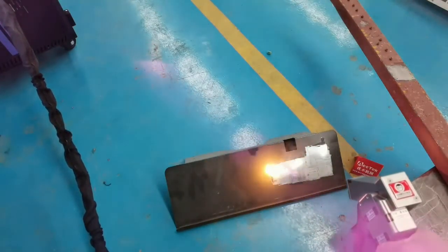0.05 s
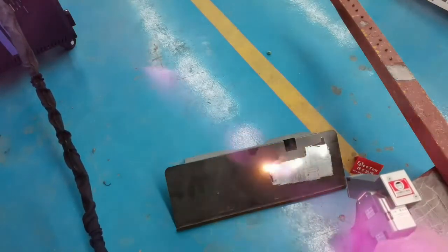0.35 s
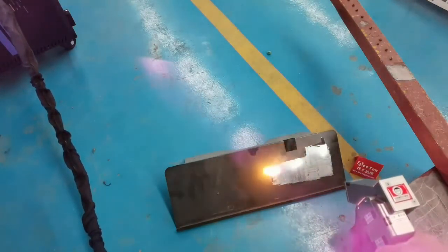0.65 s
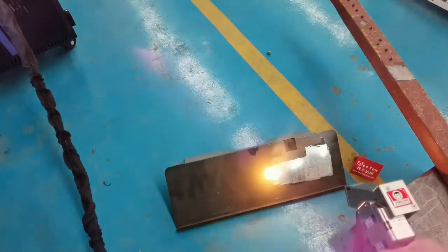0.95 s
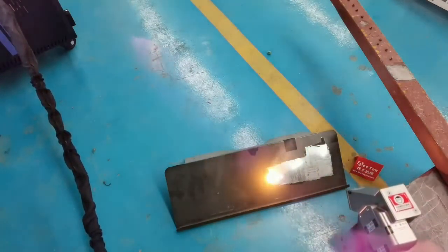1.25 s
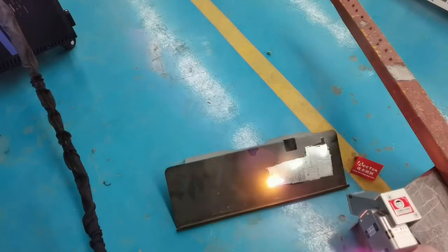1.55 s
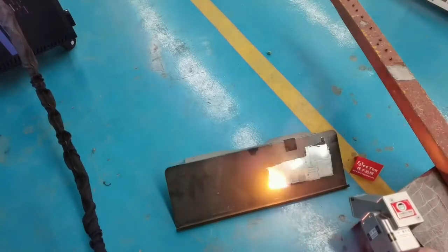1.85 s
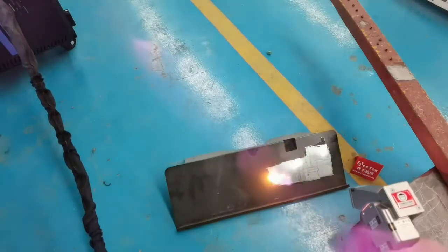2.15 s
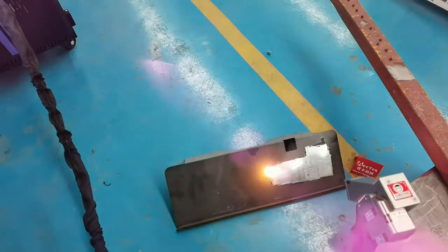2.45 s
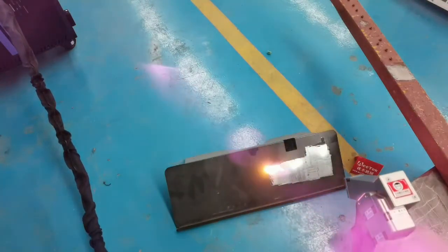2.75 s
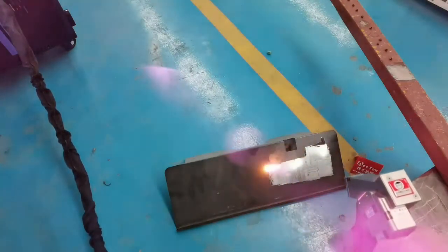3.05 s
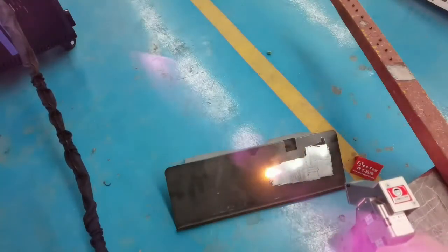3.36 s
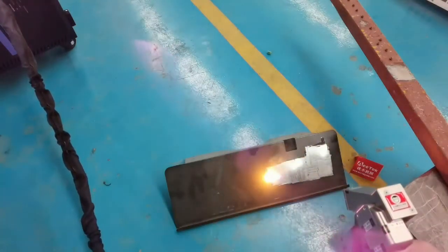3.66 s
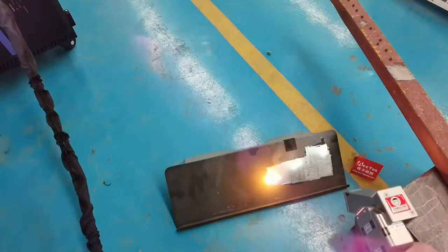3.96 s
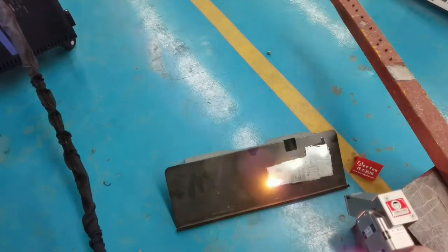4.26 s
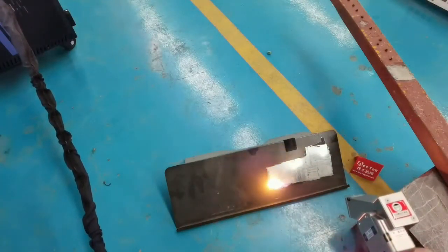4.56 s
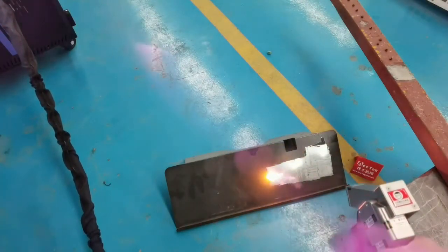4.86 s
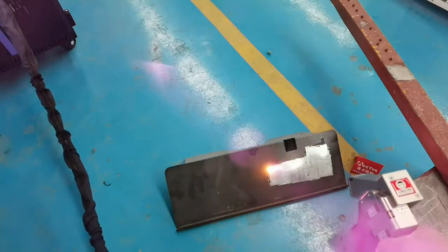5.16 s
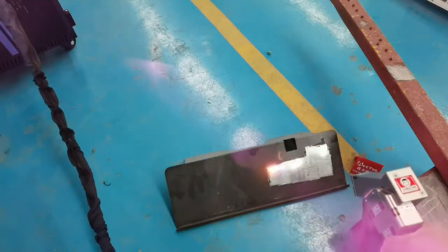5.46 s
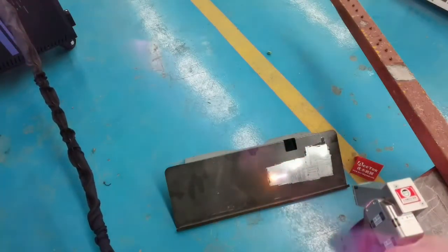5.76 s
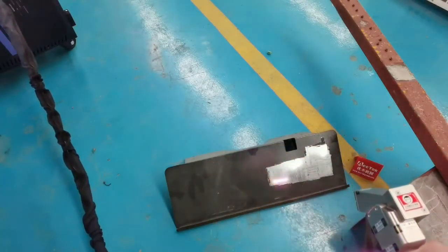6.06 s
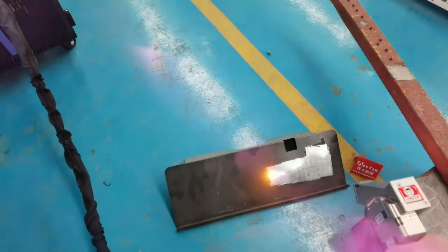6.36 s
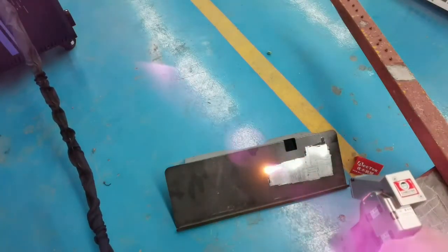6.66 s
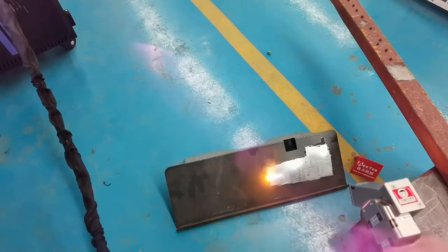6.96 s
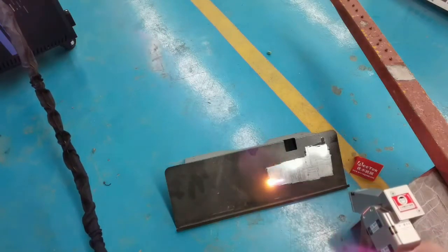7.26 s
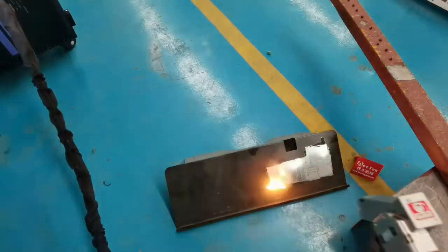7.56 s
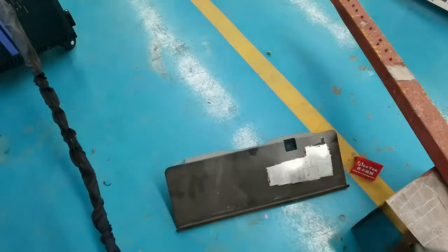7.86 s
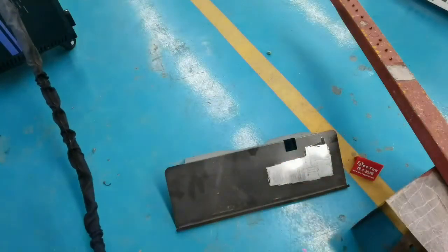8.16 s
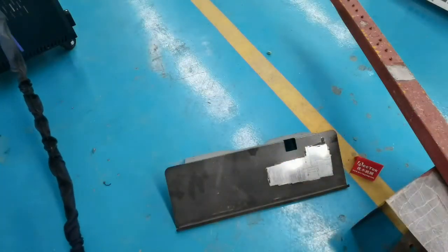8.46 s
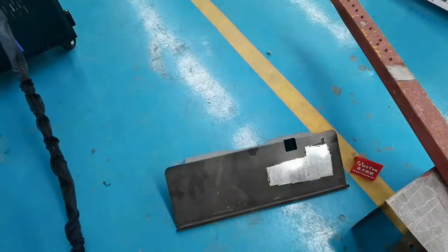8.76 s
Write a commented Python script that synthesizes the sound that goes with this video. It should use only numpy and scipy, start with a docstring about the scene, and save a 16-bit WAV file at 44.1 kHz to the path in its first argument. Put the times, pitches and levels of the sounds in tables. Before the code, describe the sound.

A hand-held laser cleaner burns coating off a steel panel close by, with a harsh, steady-pitched buzz full of snaps, sizzle and low flutter. Compressed air hisses and whistles a little farther off at the start. Past the middle the buzz thins to a fizz and the air whistles again. The buzz returns, flares and stops abruptly, leaving a fading whisper of air and the faint hum of a hard-walled workshop.

```python
"""A snapping, sizzling buzz comes first: a hand-held laser cleaner burns the coating off a steel panel.
Its beam crosses the panel about 300 times a second; each sweep puffs, snaps and sizzles, and the vapour
burns with a low flutter. Cleaned steel gives a thin fizz, and at 7.5 s the laser is switched off.
Compressed air whistles and hisses in two bouts, sets cavities ringing and trails away in a whisper.
Fans and transformers hum throughout in the hard-walled workshop, with three brief, dull rumbles."""
import sys
import numpy as np
from scipy import signal
from scipy.fft import rfft, irfft, next_fast_len
from scipy.io import wavfile
from scipy.ndimage import uniform_filter1d, map_coordinates

SR = 44100
rng = np.random.default_rng(int(sys.argv[2]) if len(sys.argv) > 2 else 0)


def output_pcm(signal):
    """Save a mono or channel-first signal as 16-bit PCM at the path in sys.argv[1].

    Samples are clipped to [-1, 1] before scaling.
    """
    pcm = np.clip(np.atleast_2d(signal).T, -1, 1) * 32767
    wavfile.write(sys.argv[1], SR, np.round(pcm).astype(np.int16))


N = 397782
TIME = np.arange(N) / SR

# mains hum: (frequency [Hz], level [dB])
MAINS_HUM = [(99.7, -60.5), (199.4, -56.5), (398.8, -78)]
# dull rumbles: (start [s], stop [s], level [dB])
RUMBLES = [(0, 0.254, -40.5), (8.37, 8.39, -49), (8.98, 9.02, -42.5)]
# reverberation of the room: (frequency [Hz], time to fall 60 dB [s])
REVERB_TIMES = [(200, 0.2), (2000, 0.38), (6000, 0.67), (14000, 0.052)]
# return of the beam's sound from the walls: (frequency [Hz], gain [dB])
WALL_RETURN = [(300, -27), (1200, -13), (3000, -12), (8000, -15)]
# left-right likeness of near and far sources: (frequency [Hz], correlation [-1 to 1])
NEAR_COHERENCE = [(300, 0.98), (600, 0.66), (1200, 0.026), (2500, 0.4), (5000, -0.25), (8000, -0.29),
                  (13000, 0.16)]
FAR_COHERENCE = [(100, 0.96), (300, 0.85), (800, 0.0013), (2000, 0.033), (5000, -0.098), (12000, -0.1)]
# spectra of the background and the air: (frequency [Hz], relative level [dB])
FAN_SPECTRUM = [(15, -40), (28, -29), (55, -3), (100, -5.5), (135, -13.5), (170, -12.5), (205, -8.5),
                (290, -21.5), (420, -22.5), (520, -15.5), (1000, -23), (2000, -22.5), (3900, -32),
                (6000, -25), (9000, -23.5), (10700, -27.5), (11600, -44), (15000, -48)]
RUMBLE_SPECTRUM = [(20, -20), (50, -8), (100, -1), (200, -7), (320, -23), (1000, -60)]
HISS_SPECTRUM = [(300, -57), (1100, -25), (1700, -11), (3000, -6), (3900, -9), (4600, 0.5), (5300, -4),
                 (6300, -1), (7800, 2.5), (9200, -16.5), (10200, -6.5), (11500, -61), (16000, -53)]
WHISPER_SPECTRUM = [(5000, -13), (7600, -13), (8600, 5), (9000, -5), (9500, 2.5), (10400, -9),
                    (11300, -33), (15000, -60)]
DUCT_DRIVE = [(2500, -18), (4500, 10), (8500, 0), (11000, -20)]
CAVITY_DRIVE = [(500, -15), (1600, 9), (2700, -6.5), (4500, -19)]
HOLLOW_TONE_DRIVE = [(1000, -25), (2200, -3), (2800, -11), (4500, -23)]
# resonances in the hiss and of blown cavities: (frequency [Hz], bandwidth [Hz], relative gain [dB])
DUCT_MODES = [(4650, 23, 6), (5250, 46, 9), (5880, 49, 8), (6120, 34, -14), (6430, 24, -34),
              (7200, 44, -13), (7500, 98, -7), (7920, 24, 4), (8040, 44, -6)]
CAVITY_MODES = [(2033, 11.6, 0), (2227, 48, -9.5), (2415, 25, 8.5)]
# blasts of compressed air: (start [s], stop [s], relative hiss level [dB], relative ring level [dB])
AIR_BLASTS = [(0.13, 0.856, -19, -32), (1.136, 1.217, -20, -35), (5.907, 6.409, -19, -28),
              (6.617, 6.696, -24.5, -30.5), (8.028, 8.225, -56, -54)]
# hollow tones as the air rushes in or slackens: (start [s], stop [s], frequency [Hz], level [dB])
CAVITY_TONES = [(0.85, 0.935, 2616, -24), (1.2, 1.3, 2600, -37), (5.912, 5.96, 2280, -32.5),
                (6.35, 6.42, 2035, -30), (7.678, 7.78, 2020, -47), (8.0, 8.2, 2580, -54)]
# nozzle tones: (start [s], stop [s], first pitch [Hz], target pitch [Hz], time constant of the climb [s],
# level [dB], fade [dB/s])
NOZZLE_TONES = [(.155, .23, 4890, 5340, .36, -21, 130), (.28, .8, 5060, 5340, .32, -20, 110),
                (.87, .89, 4912, 4912, .3, -24, 110), (1.18, 1.21, 4912, 4912, .3, -30, 90),
                (5.862, 5.872, 4710, 4800, .1, -20, 450), (5.91, 5.925, 4760, 4850, .1, -23, 300),
                (6.015, 6.14, 4900, 5060, .34, -15.3, 180), (6.18, 6.27, 4970, 5020, .08, -18, 60)]
# spectra of the beam's sounds: (frequency [Hz], relative level [dB])
FIZZ_SPECTRUM = [(4000, -34), (8500, 6), (10300, 9), (11800, -3), (15500, -1)]
FLAME_SPECTRUM = [(25, -42), (70, -22), (130, -7.5), (200, 1.5), (330, 3.5), (400, -11), (470, 1),
                  (640, -1), (1000, -9), (1800, -4), (3000, -21), (6000, -38)]
FLARE_SPECTRUM = [(80, -13), (250, 4), (1000, -7.5), (3200, 4.5), (7000, 3), (15000, -7)]
BOIL_SPECTRUM = [(1500, -10), (2300, -12), (3900, -14), (4700, -4), (5400, 5), (6400, 5), (7200, -2),
                 (8300, 7), (9300, -5.5), (10200, -7.5), (11500, -14.5), (16000, -67)]
SPATTER_SPECTRUM = [(300, -40), (600, -21), (1000, -19), (1450, 0), (1900, 5), (3300, 5.5), (4200, 3.5),
                    (8000, 7), (11500, -2), (14000, -7.5), (16000, -9.5)]
SNAP_SPECTRUM = [(400, -18), (600, -20.5), (900, 0.5), (1200, 2.5), (1500, -6), (1800, -2.5), (2400, -16.5),
                 (4000, -56.5)]
EDGE_SPECTRUM = [(1000, -59), (1500, -8.5), (1800, -4.5), (2100, -6), (2400, -8.5), (2700, -32),
                 (3300, -29), (5000, -45.5)]
SWIRL_SPECTRUM = [(300, -33), (700, 4.5), (1300, -24), (2200, 8.5), (4000, -30)]
# leftward lean of the buzz: (frequency [Hz], left gain and right loss [dB])
BUZZ_LEAN = [(300, 0), (700, .9), (1200, 1.8), (2200, 0)]
# spells with the beam on coating: (start [s], stop [s])
ON_COATING = [(0, 1.817), (2.0, 2.93), (3.14, 5.2), (6.6, 6.9), (7.03, 7.11), (7.2, 7.49)]
# relative levels of the plume: (time [s], puff [dB], edge of the snap [dB], flame [dB])
PLUME_LEVELS = [(0, -19, -26, -33.5), (.22, -24, -26, -30.5), (.35, -36.5, -35.5, -37),
                (.86, -38.5, -31, -35), (1.03, -31, -43, -37), (1.31, -28.5, -33.5, -34),
                (1.68, -34.5, -46, -36.5), (2.02, -25.5, -33.5, -42.5), (2.26, -27.5, -28.5, -40.5),
                (2.42, -28, -26.5, -40), (2.85, -33.5, -30.5, -54), (3.19, -28.5, -24, -48.5),
                (3.39, -25.5, -32, -38.5), (4.0, -31.5, -43.5, -35), (4.46, -30.5, -48, -40),
                (4.62, -25, -39.5, -40.5), (4.85, -41, -33, -47.5), (5.03, -66, -39.5, -75),
                (5.3, -66, -44, -60), (5.58, -39, -40, -49), (5.95, -38, -35, -43), (6.2, -44, -34, -67),
                (6.6, -35, -28, -45), (6.83, -30, -30, -41.5), (7.08, -34, -32, -57), (7.25, -32, -47, -49),
                (7.4, -43, -38, -43.5)]
# thick spots of coating spit, in relative levels: (time [s], puff [dB], snap [dB], flame [dB])
THICK_SPOTS = [(.19, -31, -28, -34), (1.66, -51, -37, -49), (2.27, -32, -40, -51), (2.69, -36, -40, -54),
               (2.84, -31, -50, -33), (2.91, -39, -64, -41), (3.46, -35, -45, -44), (4.37, -38, -42, -36),
               (4.55, -45, -37, -44), (4.63, -35, -40.5, -40), (4.825, -29, -39, -51),
               (4.91, -33, -43, -60), (5.215, -34.5, -49, -48), (7.05, -42, -45, -44),
               (7.225, -32, -42, -47), (7.305, -32, -44, -54)]
# flare-ups of the plume: (time [s], level [dB], time to fall 60 dB [s])
FLARE_UPS = [(5.202, -25, 0.095), (7.367, -24, 0.19), (7.415, -33, .12)]
# relative levels of the boiling coating: (time [s], boil [dB], fine spatter [dB])
SIZZLE_LEVELS = [(0, -27, -39.5), (1.14, -31, -41), (1.3, -38, -42), (1.8, -41, -40.5), (2.1, -30.5, -42.5),
                 (2.42, -37.5, -48.5), (2.68, -30.5, -43.5), (3.8, -31.5, -40.5), (4.35, -37, -40.5),
                 (4.9, -29.5, -41.5), (5.21, -30, -45.5), (5.3, -36.5, -47.5), (5.7, -34, -45.5),
                 (6.0, -33.5, -40), (6.6, -28, -38), (7.37, -34.5, -42), (7.5, -47.5, -48)]

SWEEP_HZ, TOP_HZ = 299.1, 15750
LASER_OFF_S, SHUTOFF_S = 7.535, .035


def amp(db):
    """Amplitude ratio: tenfold for every 20 dB."""
    return 10 ** (np.asarray(db) / 20)


def unit(x):
    """Normalisation to rms 1."""
    return x / np.sqrt(np.mean(x ** 2) + 1e-20)


def along(points, hz):
    """Interpolation of (frequency, value) points on a logarithmic frequency axis."""
    knots, values = np.transpose(points)
    return np.interp(np.log(hz + 1), np.log(knots + 1), values)


def curves(rows):
    """Linear interpolation in time: one curve for each column after the first."""
    times, *columns = np.transpose(rows)
    return [np.interp(TIME, times, column) for column in columns]


def held(start, stop, rise, fade):
    """Exponential growth and decay, in dB: 0 from start to stop, slopes in dB/s before and after."""
    return -rise * np.maximum(start - TIME, 0) - fade * np.maximum(TIME - stop, 0)


def settling(start, seconds):
    """Relaxation: 1 until start, then dying away with this time constant."""
    return np.exp(-np.maximum(TIME - start, 0) / seconds)


def noise():
    """White noise in two uncorrelated channels."""
    return rng.standard_normal((2, N))


def wobble(rate):
    """Random modulation: a smooth curve with rate knots a second."""
    knots = rng.standard_normal(int(N * rate / SR) + 4)
    return map_coordinates(knots, [np.arange(N) * rate / SR], mode="nearest")


def filtered(x, response):
    """Linear filtering: the spectrum of x times a complex frequency response."""
    size = next_fast_len(N + SR // 2)
    return irfft(rfft(x, size) * response(np.fft.rfftfreq(size, 1 / SR)), size)[..., :N]


def modes(table, hz):
    """Modal superposition: the complex response of damped resonances, alternating in sign."""
    return sum((-1) ** k * amp(db) * 1j * hz * width / (centre ** 2 - hz ** 2 + 1j * hz * width)
               for k, (centre, width, db) in enumerate(table))


def resonate(drive, table):
    """Forced vibration of a set of modes, at rms 1."""
    return unit(filtered(drive, lambda hz: modes(table, hz)))


def struck(pulses, spectrum, size=2048):
    """Convolution of pulses with the minimum-phase impulse response of this spectrum."""
    cepstrum = irfft(np.log(amp(along(spectrum, np.fft.rfftfreq(size, 1 / SR)))))
    cepstrum[1:size // 2] *= 2
    cepstrum[size // 2 + 1:] = 0
    response = irfft(np.exp(rfft(cepstrum)))
    return unit(signal.fftconvolve(pulses, response)[:N])


def stereo(pair, spectrum, coherence):
    """Partial coherence: two unrelated signals, coloured, form mid (rms 1) and side of left and right."""
    def response(hz):
        angle = np.arccos(np.clip(along(coherence, hz), -1, 1)) / 2
        return amp(along(spectrum, hz)) * [np.cos(angle), np.sin(angle)]
    mid, side = filtered(pair, response)
    return np.array([mid + side, mid - side]) / np.std(mid)


def patchy(channels, depth_db, bins, frames):
    """Spectral modulation: patches of the spectrum swell and fade independently."""
    spectra = signal.stft(channels, nperseg=512)[2]
    field = rng.standard_normal(spectra.shape[1:])
    for _ in range(2):
        field = uniform_filter1d(uniform_filter1d(field, bins, 0), frames, 1)
    return signal.istft(spectra * amp(depth_db * unit(field)), nperseg=512)[1][:, :N]


def workshop():
    """Ambient noise: transformers hum at mains harmonics over the broadband rush of fans."""
    hum = sum(amp(db + 1.7 * wobble(8)) * unit(np.sin(2 * np.pi * hz * TIME + wobble(5)))
              for hz, db in MAINS_HUM)
    return hum + amp(-48.5 + .42 * wobble(8.8)) * stereo(noise(), FAN_SPECTRUM, FAR_COHERENCE)


def rumble():
    """Low-frequency noise under brief envelopes is heard as dull rumbles."""
    envelope = sum(amp(db + held(start, stop, rise=340, fade=260)) for start, stop, db in RUMBLES)
    return envelope * stereo(noise(), RUMBLE_SPECTRUM, FAR_COHERENCE)


def room(x):
    """Reverberation: each frequency decays at its own rate, and the paths shift as the source moves."""
    hz, age, spectra = signal.stft(rng.standard_normal((3, 2, SR // 2)), SR, nperseg=256)
    decay = amp(-60 * age / along(REVERB_TIMES, hz)[:, None])
    tails = signal.istft(spectra * decay, SR, nperseg=256)[1]
    tails /= np.linalg.norm(tails[0, 0])
    echoes = signal.oaconvolve(np.atleast_2d(x)[None], tails, axes=2)[..., :N]
    weights = np.array([wobble(4) for _ in tails])
    weights /= np.linalg.norm(weights, axis=0)
    return np.sum(echoes * weights[:, None], axis=0)


def hollow_tones():
    """Cavity resonance: the air, as it rushes in or slackens, sets one hollow tone after another ringing."""
    air = stereo(noise(), HOLLOW_TONE_DRIVE, FAR_COHERENCE)
    return sum(amp(db + held(start, stop, rise=92, fade=92)) * resonate(air, [(hz, 38, 0)])
               for start, stop, hz, db in CAVITY_TONES)


def air_jet():
    """Turbulence hisses, building with the pressure, and drives resonances; the hollow ring outlasts it."""
    hiss_db = np.max([db + held(start, stop, rise=350, fade=68) - 5 * settling(start, .15)
                      for start, stop, db, _ in AIR_BLASTS], axis=0)
    ring_db = np.max([db + held(start, stop, rise=350, fade=18.5)
                      for start, stop, _, db in AIR_BLASTS], axis=0)
    rush = stereo(patchy(noise(), depth_db=4.5, bins=2, frames=20), HISS_SPECTRUM, FAR_COHERENCE)
    duct = resonate(stereo(noise(), DUCT_DRIVE, FAR_COHERENCE), DUCT_MODES)
    hiss = amp(hiss_db + 1.25 * wobble(25)) * (amp(-3) * rush + amp(-5.5) * duct)
    ring = resonate(stereo(noise(), CAVITY_DRIVE, FAR_COHERENCE), CAVITY_MODES)
    whisper = stereo(patchy(noise(), depth_db=3.5, bins=2, frames=24), WHISPER_SPECTRUM, FAR_COHERENCE)
    whisper_db = -47.5 + held(7.67, 7.67, rise=65, fade=19)  # the last thin stream of air
    return hiss + amp(ring_db + 4.5 + .51 * wobble(12)) * ring + amp(whisper_db) * whisper


def whistle():
    """Flow-excited oscillation: the nozzle's tone stammers and climbs as the pressure builds."""
    tone = np.zeros(N)
    for start, stop, first_hz, target_hz, climb, db, fade in NOZZLE_TONES:
        hz = target_hz + (first_hz - target_hz) * settling(start, climb)
        angle = 2 * np.pi * np.cumsum(hz + 30 * wobble(400)) / SR
        dropouts_db = 6 * np.abs(wobble(70))
        level_db = db + held(start, stop, rise=4 * fade, fade=fade) - dropouts_db
        tone += amp(level_db) * unit(np.sin(angle) + amp(-10.5) * np.sin(2 * angle))
    return (tone + amp(-6) * room(tone)) * amp([[-1], [1]])  # a little to the right


def bareness(run_on_s=.078, run_off_s=.055):
    """Linear crossfade: 0 while the beam lies on coating, 1 on cleaned steel."""
    outside = [np.maximum((start - TIME) / run_on_s, (TIME - stop) / run_off_s)
               for start, stop in ON_COATING]
    return np.clip(np.min(outside, axis=0), 0, 1)


def plume():
    """Ablation levels in dB: they sink on cleaned steel, flicker on uneven coating, spit at thick spots."""
    puff, edge, flame = curves(PLUME_LEVELS)
    usual_puff_db, usual_flame_db = -31, -40
    bare = bareness()
    bite_db = -25.5 * bare + .9 * wobble(18)
    snap = -36.5 + .53 * (puff - usual_puff_db) + .12 * (flame - usual_flame_db)
    spit_puff, spit_snap, spit_flame = sum(amp(levels)[:, None] * amp(held(at, at, rise=305, fade=305))
                                           for at, *levels in THICK_SPOTS)

    def with_spit(db, spit):
        return 20 * np.log10(amp(db + 1.5 * wobble(16)) + spit)
    flame = with_spit(flame - 12.5 * bare, spit_flame)
    sputter = -41.5 + .47 * (flame - usual_flame_db) + 2.3 * wobble(11)
    puff = with_spit(puff + bite_db, spit_puff)
    snap = with_spit(snap + bite_db, spit_snap)
    edge = with_spit(edge + bite_db, amp(3) * spit_snap)
    return puff, snap, edge, with_spit(sputter, spit_flame), flame


def retraced(memory_s, share):
    """Comb filtering: the beam retraces its line, so a share of the crackle repeats earlier sweeps."""
    feedback = np.exp(-1 / (SWEEP_HZ * memory_s))
    delay = np.exp(-2j * np.pi * np.fft.rfftfreq(N, 1 / SR) / SWEEP_HZ)
    repeating = unit(irfft(rfft(noise()) / (1 - feedback * delay), N))
    return np.sqrt(share) * repeating + np.sqrt(1 - share) * noise()


def bare_metal(phase, coated_db=-62, bare_db=-38.5):
    """Amplitude-modulated noise: cleaned steel gives a thin, bright fizz that swells once a sweep."""
    fizz = retraced(memory_s=.03, share=.14) * amp(2.6 * np.cos(2 * np.pi * phase) + 1.3 * wobble(73))
    fizz_db = coated_db + (bare_db - coated_db) * bareness()
    return amp(fizz_db) * stereo(fizz, FIZZ_SPECTRUM, NEAR_COHERENCE)


def burning_vapour(phase, flame_db):
    """Combustion noise: the vapour burns with a fluttering roar and now and then flares up."""
    flutter = noise() * amp(2 * np.cos(2 * np.pi * phase) + 1.67 * wobble(35))
    roar = amp(flame_db) * stereo(flutter, FLAME_SPECTRUM, NEAR_COHERENCE)
    flares = sum(amp(db - 60 * np.abs(TIME - at) / t60) * np.clip((TIME - at) / .0011 + 1, 0, 1)
                 for at, db, t60 in FLARE_UPS)
    return roar + flares * stereo(noise(), FLARE_SPECTRUM, NEAR_COHERENCE)


def sizzle(phase):
    """Vaporisation: the coating boils off in crackle that swells once a sweep and drifts in colour."""
    boil_db, spatter_db = curves(SIZZLE_LEVELS)
    beat = np.cos(2 * np.pi * phase)
    boil = patchy(retraced(memory_s=.06, share=.42), depth_db=2, bins=3, frames=44)
    boil *= amp(2 * beat + 2.1 * wobble(70) + .98 * wobble(700))
    spatter = patchy(retraced(memory_s=.06, share=.45), depth_db=1.3, bins=5, frames=24)
    spatter *= amp(1.55 * beat + 1.34 * wobble(55) + 1.9 * wobble(1500))
    return (amp(boil_db + 1) * stereo(boil, BOIL_SPECTRUM, NEAR_COHERENCE)
            + amp(spatter_db + 9.5) * stereo(spatter, SPATTER_SPECTRUM, NEAR_COHERENCE))


def sweep_pulses(phase, scatter_db, jitter_s):
    """Quasi-periodic pulse train: one pulse a sweep, uneven in size and timing."""
    centres = np.interp(np.arange(1, int(phase[-1])), phase, np.arange(N))
    chance = rng.standard_normal((len(centres), 2))
    centres += jitter_s * SR * chance[:, 0]
    taps = np.floor(centres)[:, None] + np.arange(-7, 9)
    offset = taps - centres[:, None]
    shapes = np.sinc(offset) * np.cos(np.pi * offset / 16) ** 2  # places a pulse between samples
    pulses = shapes * amp(scatter_db * chance[:, 1:])
    return np.bincount(np.clip(taps, 0, N - 1).astype(int).ravel(), pulses.ravel(), N)


def buzz(phase, puff_db, snap_db, edge_db, sputter_db, right_lead_s=.00006):
    """Periodic excitation: each sweep expels a puff of vapour and a snap; their rate sets the pitch."""
    pulses = sweep_pulses(phase, scatter_db=2.5, jitter_s=8e-6)
    puff = amp(puff_db - 5 + .52 * wobble(45)) * unit(np.cos(2 * np.pi * phase + np.pi / 4))
    snap = amp(snap_db - 2.5) * struck(pulses, SNAP_SPECTRUM)
    snap += amp(edge_db - 2.5) * struck(pulses, EDGE_SPECTRUM)
    snap = patchy(snap[None], depth_db=.5, bins=4, frames=20)[0]  # the plume keeps changing shape
    swirl = stereo(noise() * amp(5.6 * np.cos(2 * np.pi * phase)), SWIRL_SPECTRUM, NEAR_COHERENCE)
    swirl *= amp(snap_db - 12.5)  # stronger snaps stir up more turbulence
    hollow = unit(filtered(rng.standard_normal(N), lambda hz: modes([(592, 49, 0)], hz) ** 2))
    octave = unit(np.cos(4 * np.pi * phase + .69 * wobble(24)))  # the beam passes out and back
    sputter = amp(sputter_db) * (octave + amp(-7) * hollow)

    def left_right(hz):
        delay = np.exp(np.outer([-1j, 1j], np.pi * hz * right_lead_s))
        return delay * amp(np.outer([1, -1], along(BUZZ_LEAN, hz)))
    return filtered(puff + snap + sputter, left_right) + swirl


def laser():
    """Common modulation: all the beam's sounds follow one sweep, until the trigger is let go."""
    phase = SWEEP_HZ * TIME + .018 * wobble(4.92)  # in cycles; the hand sways the spot
    trigger = np.clip((LASER_OFF_S - TIME) / SHUTOFF_S, 0, 1)
    *buzz_db, flame_db = plume()
    crackle = amp(.94 * wobble(13)) * sizzle(phase)  # the coating is uneven
    beam = buzz(phase, *buzz_db) + crackle + bare_metal(phase) + burning_vapour(phase, flame_db)
    return trigger * beam


def scene():
    """Superposition: the laser close by, the air farther off, the workshop all round."""
    beam = laser()
    echo = room(filtered(beam, lambda hz: amp(along(WALL_RETURN, hz))))
    return beam + echo + air_jet() + hollow_tones() + whistle() + workshop() + rumble()


def record(dry):
    """Band limiting: nothing is heard above TOP_HZ."""
    return filtered(dry, lambda hz: hz < TOP_HZ)


dry = scene()
out = record(dry)
output_pcm(out)
```